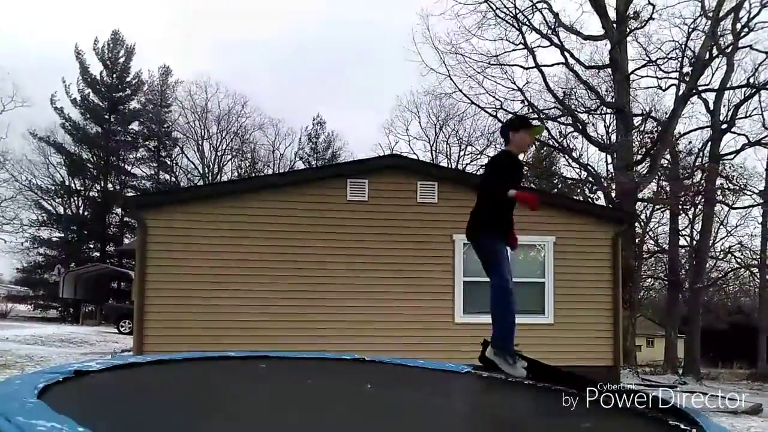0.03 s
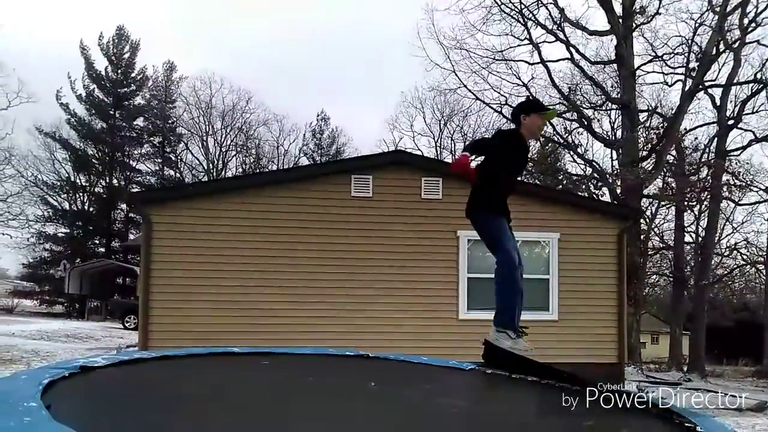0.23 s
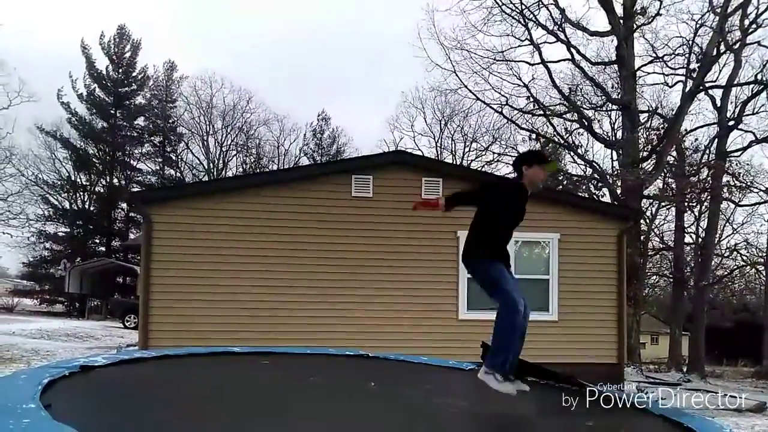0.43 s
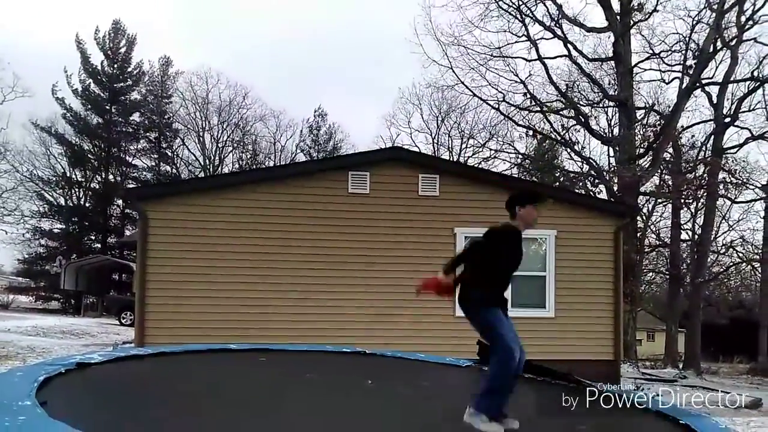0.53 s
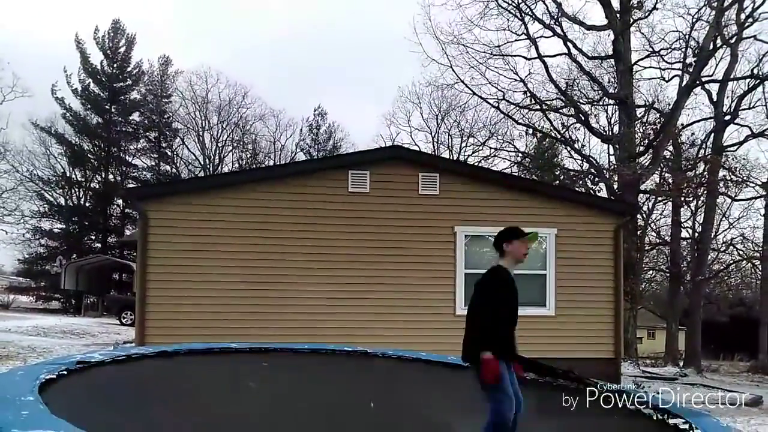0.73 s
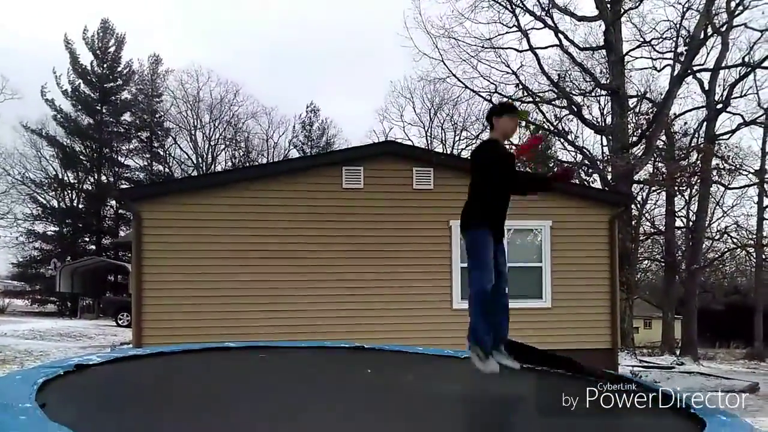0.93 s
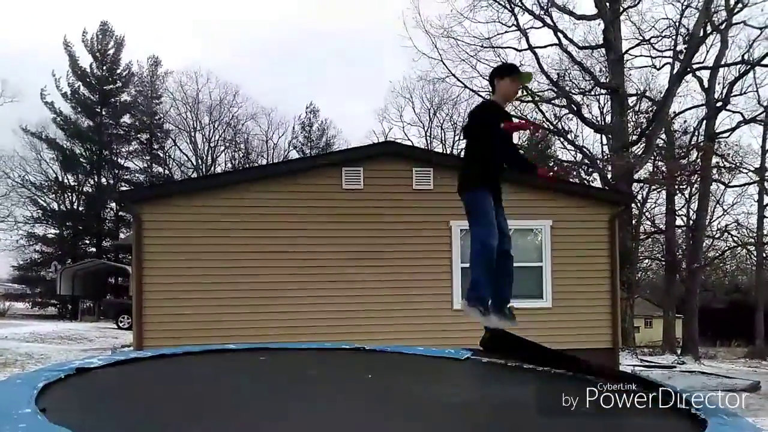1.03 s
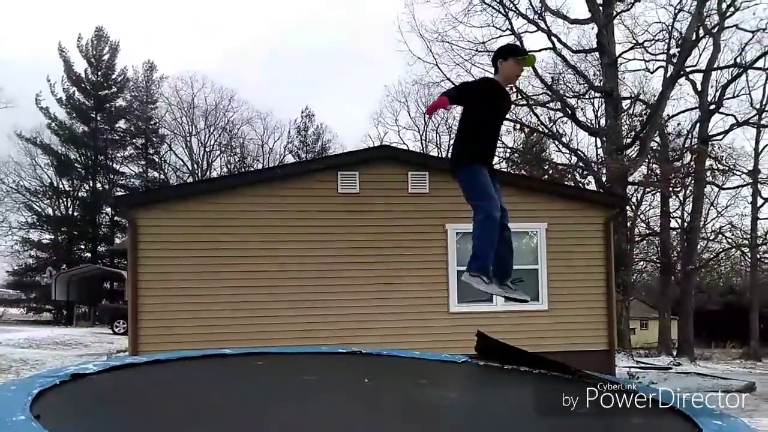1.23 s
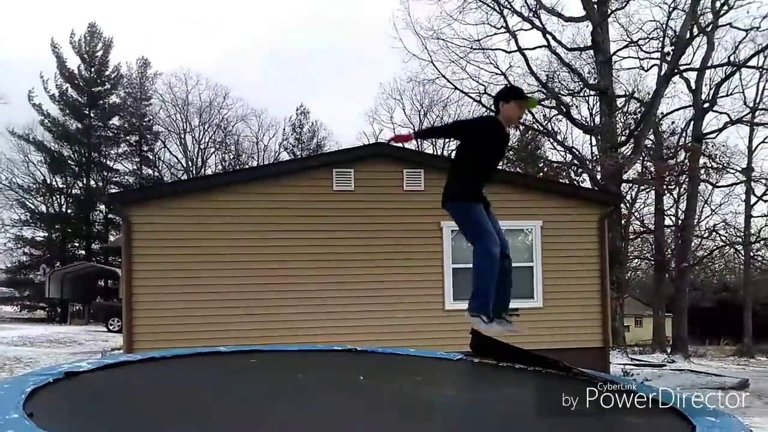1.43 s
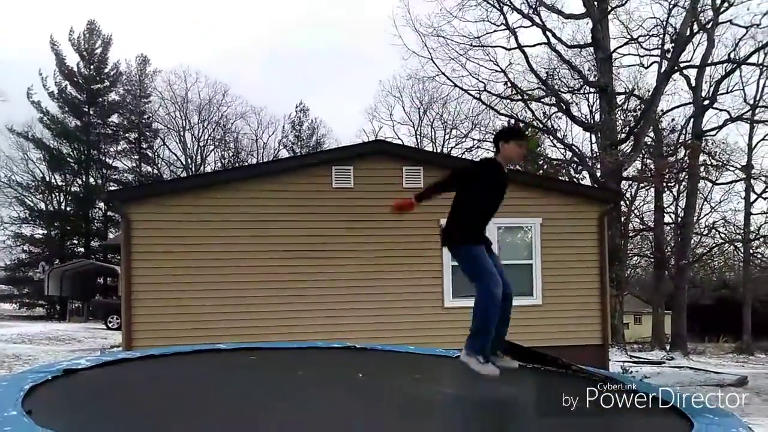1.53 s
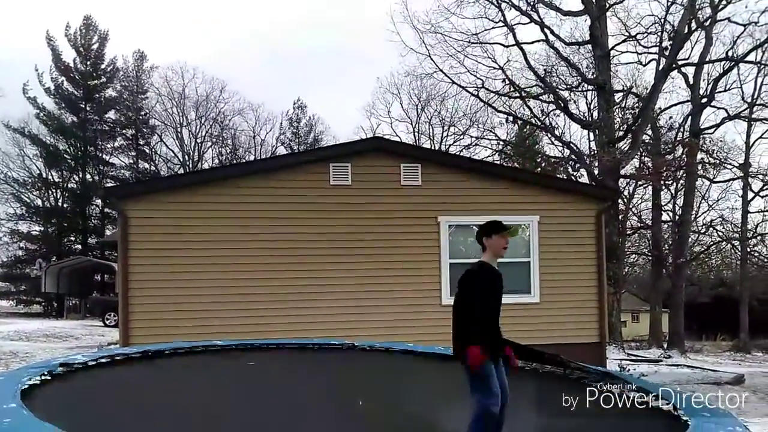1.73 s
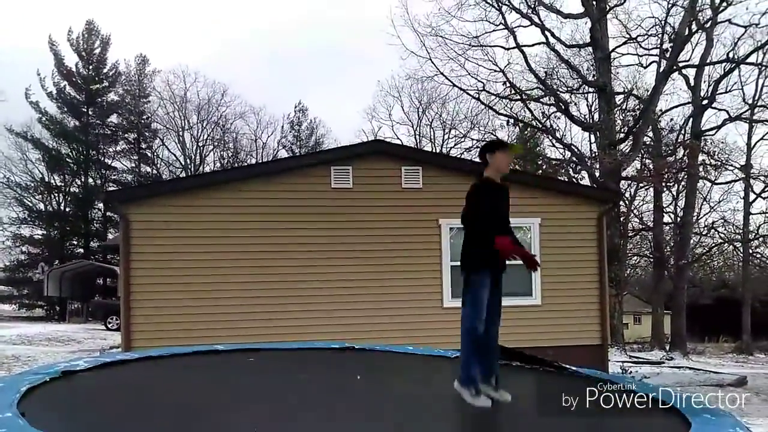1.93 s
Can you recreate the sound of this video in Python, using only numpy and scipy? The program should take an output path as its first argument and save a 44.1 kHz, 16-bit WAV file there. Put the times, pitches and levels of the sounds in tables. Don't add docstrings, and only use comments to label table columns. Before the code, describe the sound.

Outdoors in a yard, a trampoline's springs jingle sharply on loading and release, feet thump the mat, then a near-silent airborne pause with wind puffs before the next rattling landing, captured close by phone.

```python
import sys
import numpy as np
from scipy import signal
from scipy.fft import rfft, irfft
from scipy.io import wavfile
from scipy.ndimage import uniform_filter1d

SR = 44100
rng = np.random.default_rng(int(sys.argv[2]) if len(sys.argv) > 2 else 0)


def volts_from_db(level):
    exponent = np.asarray(level, float) / 20
    return 10 ** exponent


def generate_wav(sig):
    pcm = np.round(np.clip(np.atleast_2d(sig).T, -1, 1) * 32767).astype(np.int16)
    wavfile.write(sys.argv[1], SR, pcm)


N = 88200
T = np.arange(N) / SR
CLICKS_PER_S, UNEVEN_DB = 1800, 3.5


def rms_one(x):
    return x / np.sqrt(np.mean(x ** 2) + 1e-20)


def at_hz(points, hz):
    points = np.array(points)
    return np.interp(np.log(hz), np.log(points[:, 0]), points[:, 1])


def filtered(x, order, hz, kind="low"):
    return signal.sosfilt(signal.butter(order, hz, kind, fs=SR, output="sos"), x)


def drift(rate_hz):
    r = np.exp(-2 * np.pi * rate_hz / SR)
    noise = signal.lfilter([1], [1, -2 * r, r * r], rng.standard_normal(N + SR))
    return rms_one(noise[SR:])


def ringing(hz, db, t60):
    t = T[:SR // 5, None]
    modes = volts_from_db(db) * volts_from_db(-60 * t / t60) * np.sin(2 * np.pi * hz * t)
    body = modes @ rng.choice([-1., 1.], len(hz))
    return body / np.sqrt(np.sum(body ** 2))


def clicks(rate, uneven_db):
    size = volts_from_db(uneven_db * np.minimum(rng.exponential(1, N), 4))
    size = size * rng.choice([-1, 1], N)
    return rms_one(size * (rng.random(N) < rate / SR))


def lingering(drive, t60):
    r = volts_from_db(-120 / (t60 * SR))
    return np.sqrt(signal.lfilter([1 - r], [1, -r], drive ** 2))


def pushes(rows, cycles):
    s, db, hz = np.transpose(rows)[:3, :, None]
    turn = np.maximum(T - s, 0) * hz
    envelope = ((3.185 * turn / cycles) * np.exp(1 - 3.216 * turn / cycles)) ** 1.6
    return volts_from_db(db) * np.sin(2 * np.pi * turn) * envelope


def shaking(column):
    # t/s, coil chatter level/dB, frame clank level/dB, hold/s, decay/(dB/s)
    jolts = [(0.0, -31, -35, 0.021, 169), (.171, -41.5, -34, 0.025, 408), (0.695, -41.5, -48.5, 0.071, 295),
             (0.705, -41, -38, 0.067, 297), (0.752, -20.5, -27.5, 0.0071, 304.5),
             (0.764, -21, -32, .03, 279), (0.839, -30, -30.5, 0.034, 213), (0.954, -25, -35, 0.023, 287),
             (0.969, -49, -27, 0.0046, 345), (1.018, -29.5, -37.5, 0.0033, 308),
             (1.085, -47, -41.5, 0.017, 300), (1.099, -35, -37, 0.01, 300), (1.109, -42, -37, 0.025, 258),
             (1.18, -63.5, -55.5, 0.015, 128), (1.729, -83.5, -58.5, 0.098, 293),
             (1.819, -35.5, -37, 0.025, 294), (1.836, -23.5, -31, 0.022, 298),
             (1.862, -23.5, -32, 0.026, 458), (1.926, -28.5, -25.5, 0.0071, 403),
             (1.982, -36.5, -40, 0.022, 299)]
    rise_s = .005
    power = np.zeros(N)
    for row in jolts:
        start, level_db, hold_s, decay = row[0], row[column], row[3], row[4]
        t = T - start
        rise = np.clip(t / rise_s, 0, 1) if start > 0 else 1
        power += (rise * volts_from_db(level_db - decay * np.maximum(t - rise_s - hold_s, 0))) ** 2
    return np.sqrt(power)


def struck(drive, spectrum, t60, count, modes):
    out, low, high = np.zeros((2, N)), spectrum[0][0], spectrum[-1][0]
    for k in range(count):
        place = (np.arange(modes) + rng.random(modes)) / modes
        hz = low * (high / low) ** (place ** .8)
        db = at_hz(spectrum, hz) + 3.2 * np.log10(hz)
        mode_db = db + np.minimum(rng.normal(0, 5.0, modes), 5.0)
        body = ringing(hz, mode_db, t60 * volts_from_db(rng.normal(0, 2.1, modes)))
        body = body + volts_from_db(-4.5) * ringing(hz, db, 0.021)
        swing = volts_from_db(2.5 * drift(29.0))
        taps = clicks(CLICKS_PER_S * 2 / count, UNEVEN_DB)
        out[k % 2] += signal.fftconvolve(drive * swing * taps, body)[:N]
    return out * np.sqrt(2 / count)


def air():
    # f/Hz, level/dB
    hiss_spectrum = [(88, -35), (150, -8), (306, -11.5), (1270, -20.5), (1400, -19.5), (1770, -20),
                     (4120, -24.5), (9270, -19), (15000, -45)]
    hz = np.maximum(np.arange(N // 2 + 1) * SR / N, 1)
    shape = volts_from_db(at_hz(hiss_spectrum, hz)) * (hz > 100)
    hiss = irfft(rfft(rng.standard_normal((2, N))) * shape, N)
    return volts_from_db(-68.0) * rms_one(hiss)


def wind():
    # t/s, level/dB
    gusts = [(0.0, -77), (.27, -69.5), (0.519, -65), (.6, -82), (.7, -62), (.95, -55), (1.08, -77),
             (1.159, -51), (1.289, -65.5), (1.33, -53.5), (1.479, -51.5), (1.7, -57.5), (1.82, -54),
             (1.87, -46), (2.0, -38)]
    s, db = np.transpose(gusts)
    shared = 1
    white = rng.standard_normal((3, N))
    low = filtered(white[:2] + shared * white[2], 2, [42.2, 90], "band")
    lumps = volts_from_db(2 * np.array([drift(4.7), drift(3.4)]))
    return rms_one(low * lumps) * volts_from_db(np.interp(T, s, db) + 3.0)


def puffs():
    # t/s, peak level/dB, f/Hz
    puff_events = [(.41, -62, 90), (.43, -56, 170), (1.316, -43, 67), (1.333, -41, 58.7), (1.364, -40, 62),
                   (1.383, -38, 78.7), (1.397, -43.5, 109), (1.408, -37.5, 110.2), (1.431, -39, 98.6),
                   (1.452, -38.5, 62.7), (1.473, -31.5, 85), (1.484, -38.5, 58.3), (1.503, -48, 69),
                   (1.552, -40.5, 62.4), (1.572, -39.5, 69), (1.627, -42, 85.5), (1.689, -48, 81.2)]
    lean = rng.uniform(0, 1.0, len(puff_events))
    sides = np.array([1 + lean, 1 - lean])
    return filtered(sides @ pushes(puff_events, 1.26), 2, 370)


def thuds():
    # t/s, peak level/dB, f/Hz
    knock_events = [(.6415, -25, 115), (.658, -39, 72), (.68, -47, 164), (.715, -45.5, 71),
                    (.788, -41.5, 69), (.851, -24, 216), (.858, -20.5, 180), (.864, -22, 415),
                    (.872, -23.5, 115), (.878, -20.5, 307), (.888, -25.5, 266), (.895, -30, 290),
                    (.905, -36, 108), (.93, -37.5, 59), (1.112, -39.5, 177), (1.119, -29.5, 340),
                    (1.127, -37.5, 316), (1.139, -36, 293), (1.135, -47, 70.6), (1.155, -39.5, 188),
                    (1.19, -45.5, 60), (1.196, -54, 220), (1.733, -30, 192.5), (1.739, -35, 299),
                    (1.744, -31.5, 90), (1.9, -46, 200), (1.928, -28, 163), (1.934, -16, 147),
                    (1.942, -21.5, 320), (1.953, -25, 196), (1.965, -35, 80)]
    loaded_from_s = .7
    knocks = pushes(knock_events, 1.11).sum(axis=0)
    noise = rms_one(filtered(rng.standard_normal(N), 2, [140, 700], "band"))
    rumble = lingering(knocks * (T > loaded_from_s), 0.26) * noise
    return filtered(knocks, 2, 640) + volts_from_db(-9.5) * rumble


def ticks():
    # t/s, level/dB, low f/Hz,
    # high f/Hz, t60/s
    tick_events = [(0.0, -16, 6560, 12730, 0.12), (0.0, -18, 2800, 4960, 0.2),
                   (.005, -13, 6500, 9000, 0.12), (0.023, -15.5, 6500, 9400, 0.1),
                   (.034, -15.5, 6500, 9700, 0.037), (.184, -19.5, 6000, 8800, 0.061),
                   (.759, -11, 6000, 9520, 0.011), (.812, -10, 6500, 9500, .03),
                   (0.981, -24, 6500, 9400, 0.037), (1.026, -18, 6000, 9500, 0.043),
                   (1.118, -20.5, 6000, 9400, 0.023), (1.846, -22, 6500, 9450, 0.017),
                   (1.858, -22, 6500, 9500, .02), (0.419, -46.5, 4000, 14100, 0.022),
                   (0.639, -56.5, 904, 9020, 0.15), (1.467, -44.5, 1420, 2540, 0.052),
                   (.7, -25.5, 2980, 15500, 0.009), (0.771, -2, 6500, 9430, 0.026),
                   (0.773, -10, 6550, 9020, 0.019), (0.785, -4, 6500, 9590, 0.027),
                   (1.8745, 2.5, 6600, 9000, 0.019), (1.892, -3, 6500, 9230, 0.033),
                   (.955, -22, 4470, 15500, 0.0294), (1.735, -24.5, 7400, 14900, 0.041),
                   (1.738, -46, 6290, 14900, 1)]
    rise_s = .0015
    out = np.zeros((2, N + SR))
    t = T[:SR // 4]
    for s, db, low_hz, high_hz, t60 in tick_events:
        envelope = np.minimum(t / rise_s, 1) * volts_from_db(db - 60 * t / t60)
        burst = rng.standard_normal((2, len(t))) * envelope
        start = int(s * SR)
        out[:, start:start + len(t)] += filtered(burst + 1e-18, 2, [low_hz, high_hz], "band")
    return out[:, :N]


def hooks():
    # t/s, peak level/dB, f/Hz
    dull_hooks = [(0.011, -51, 790), (0.02, -37.5, 816), (0.049, -51, 740), (0.071, -36.5, 830),
                  (0.113, -45.5, 980), (0.191, -38, 630), (0.209, -41.5, 670), (0.771, -35, 1030),
                  (0.986, -22.5, 900), (1.0, -38.5, 767), (1.012, -38.5, 800), (1.088, -35.5, 870),
                  (1.12, -28.5, 803), (1.142, -37.5, 722), (1.848, -50, 820), (1.873, -39, 1090)]
    # t/s, peak level/dB, f/Hz
    bright_hooks = [(.018, -28, 1800), (.0254, -13.5, 2710), (.176, -22, 1900), (.185, -20, 1450),
                    (.190, -24, 2300), (.1974, -34, 1800), (.2184, -37, 2270), (.2574, -42, 2340),
                    (.3202, -55.5, 1990), (.759, -16.5, 1660), (.770, -20, 2030), (.7896, -19, 1730),
                    (.853, -16.5, 3060), (.8874, -29, 1350), (.9817, -13, 1760), (1.116, -15, 2750),
                    (1.1632, -35, 1510), (1.469, -54.5, 2326), (1.847, -18, 1580), (1.875, -10, 2410),
                    (1.9345, -25, 1540)]
    t60_cycles, rise_s = 35.6, 0.0023
    out = np.zeros((2, N + SR))
    for rows, gain_db in ((dull_hooks, 2.5), (bright_hooks, -2)):
        lags_s = rng.uniform(-2e-4, 2e-4, len(rows))
        for (s, db, hz), lag in zip(rows, lags_s):
            delay = np.array([[2e-4 + lag], [2e-4 - lag]]) * min(hz / 2000, 1)
            t = np.maximum(T[:SR // 10] - delay, 0)
            envelope = volts_from_db(db + gain_db - 60 * t * hz / t60_cycles) * np.minimum(t / rise_s, 1)
            start = int(s * SR)
            out[:, start:start + SR // 10] += envelope * np.sin(2 * np.pi * hz * t)
    return out[:, :N]


def clanks():
    # t/s, peak level/dB, f/Hz, t60/s
    clank_events = [(.174, -33.5, 653, 0.094), (0.182, -48.5, 372, 0.16), (.42, -55.5, 867, 0.034),
                    (.639, -45.5, 764, 0.035), (.757, -26.5, 780.6, 0.052), (0.759, -41, 378.3, 0.25),
                    (0.861, -35.5, 450, 0.093), (.978, -29, 909, 0.1), (0.983, -47, 389, 0.49),
                    (1.107, -31.5, 724, 0.049), (1.735, -40, 760, 0.049), (1.736, -41, 397, 0.074),
                    (1.845, -30, 802, 0.085)]
    s, db, hz, t60 = np.transpose(clank_events)[:, :, None]
    t = np.maximum(T - s, 0)
    envelope = volts_from_db(db - 60 * t / t60) * np.minimum(t / 0.0044, 1)
    pair = np.sin(2 * np.pi * hz * t) + .5 * np.sin(2 * np.pi * 1.06 * hz * t)
    return (envelope * pair).sum(axis=0)


def frame():
    # f/Hz, level/dB
    frame_spectrum = [(240, -48), (400, -12.5), (510, -16), (1130, -7.5), (1280, -7), (1680, 0), (3080, -8),
                      (3960, -12.5), (5000, -8.5), (6500, -30), (11000, -120)]
    shared = .5
    drive = shaking(column=2)
    both = struck(drive, frame_spectrum, 0.063, count=6, modes=50)
    both = filtered(both, 7, 568, "high")
    low = filtered(both[1] - both[0], 2, 900)
    common = low * np.array([[shared], [-shared]])
    rattle = filtered([clicks(980, 3.0), clicks(790, 6.2)], 2, [1670, 2600], "band")
    echo = lingering(drive, 0.45) * rms_one(rattle)
    return both + common + volts_from_db(-12.5) * echo + clanks()


def coils():
    # f/Hz, level/dB
    coil_spectrum = [(1880, -17.5), (3200, -16.5), (5990, -15), (7530, -3.5), (11300, -16.5),
                     (12100, -20.5), (15100, -17), (15700, -35.5), (16000, -57)]
    # f/Hz, level/dB
    loud_modes = [(5559, -14), (6588, -6), (6988, -7), (7070, -8), (7235, -7), (7397, 0), (7455, -1),
                  (7560, -5), (7700, -7), (7975, -7), (8050, -6), (8400, -9), (8700, -9), (8872, -6)]
    drive = shaking(column=1)
    hz, db = np.transpose(loud_modes)
    loud = []
    for side in range(2):
        taps = drive * clicks(CLICKS_PER_S, UNEVEN_DB)
        loud.append(signal.fftconvolve(taps, ringing(hz, db, .13))[:N])
    chatter = struck(drive, coil_spectrum, 0.093, count=6, modes=75)
    return 1.156 * (chatter + volts_from_db(-6) * np.array(loud))


def scene():
    left_db = -0.56
    steel = (coils() + frame()) * volts_from_db(np.array([[left_db], [-left_db]]))
    return steel + thuds() + puffs() + wind() + air() + hooks() + ticks()


def thinned(x):
    treble_hz, dip_hz = 9000, 4600
    hz, s, z = signal.stft(x, SR, nperseg=1024)
    line_hz = hz[:, None]
    level = np.sqrt(uniform_filter1d(np.abs(z) ** 2, size=15, axis=1))
    patches = rng.standard_normal((len(hz) // 9 + 1, len(s) // 4 + 1))
    patches = patches.repeat(9, axis=0).repeat(4, axis=1)[:len(hz), :len(s)]
    away_khz = np.maximum(line_hz - treble_hz - 2000, -np.abs(line_hz - dip_hz) - 2500) / 1000
    bar_db = 1.5 * np.minimum(away_khz, 1.5) + 8.0 * patches
    strong = np.abs(z) > level * volts_from_db(bar_db)
    quiet_moment = level.max(axis=1, keepdims=True) < volts_from_db(-62)
    keep = strong | (line_hz < 3000) | (quiet_moment & (line_hz < treble_hz))
    return signal.istft(z * keep, SR, nperseg=1024)[1][:, :N]


def band_limit(x):
    return signal.sosfilt(signal.butter(12, 16200, fs=SR, output="sos"), x)


def record(dry):
    cut = filtered(dry, 3, 42, "high")
    cut = signal.sosfilt(signal.cheby2(10, 60, 16200, fs=SR, output="sos"), cut)
    return band_limit(thinned(cut))


dry = scene()
out = record(dry)
generate_wav(out)
```